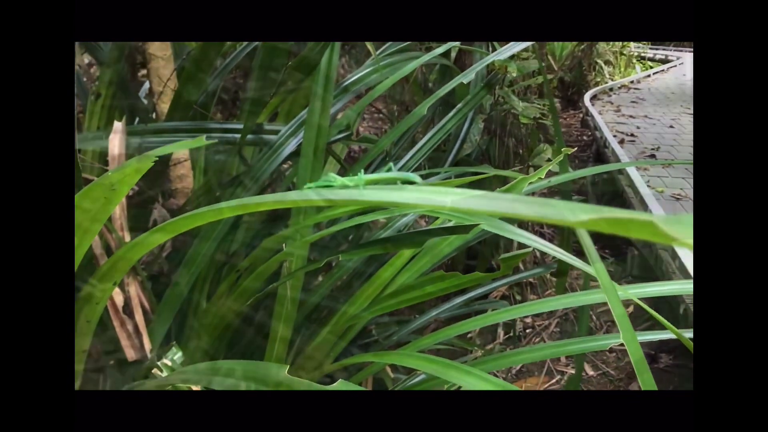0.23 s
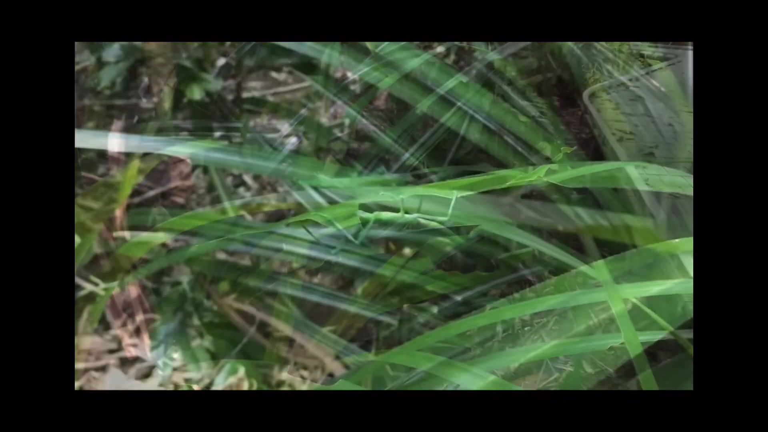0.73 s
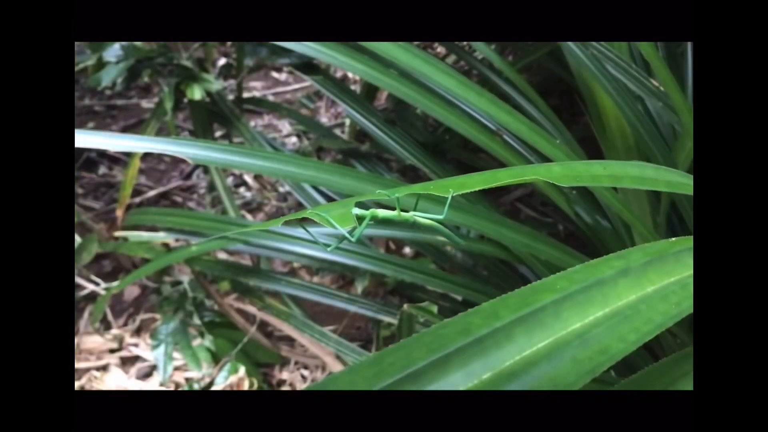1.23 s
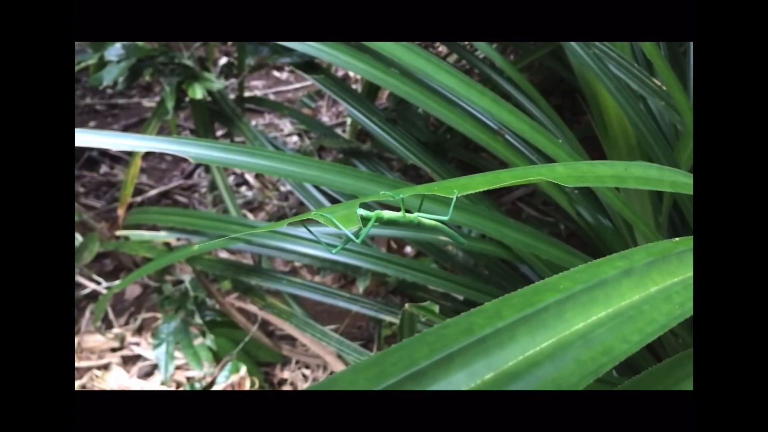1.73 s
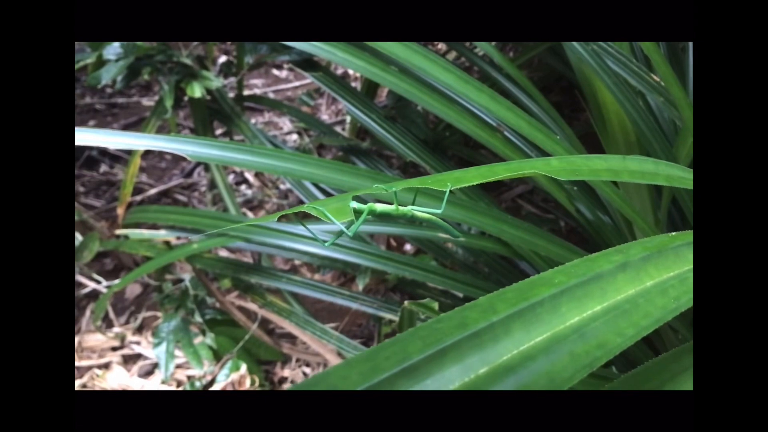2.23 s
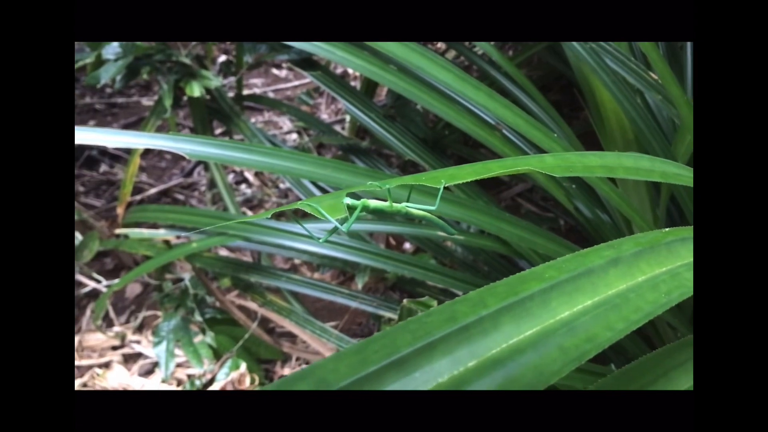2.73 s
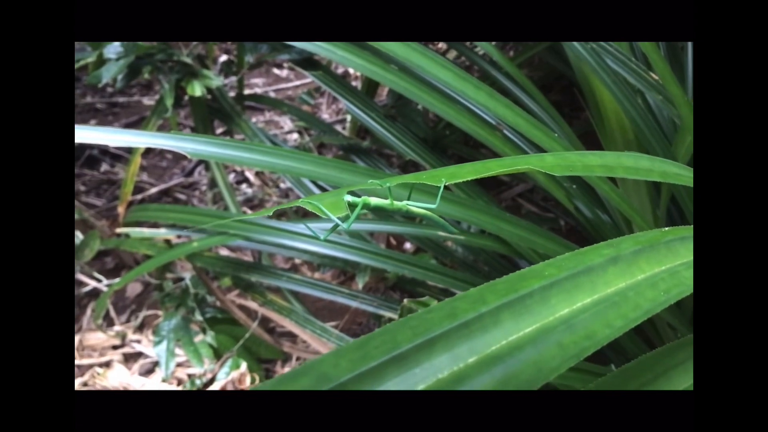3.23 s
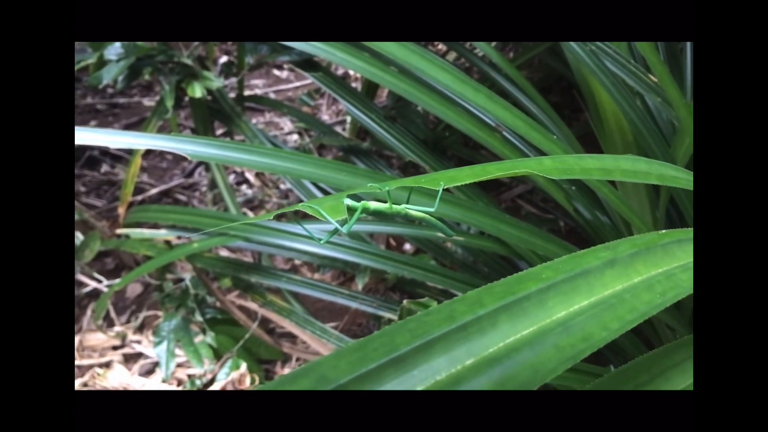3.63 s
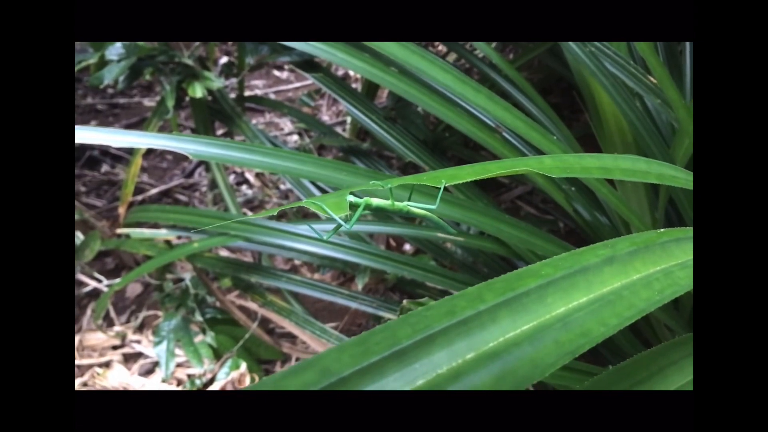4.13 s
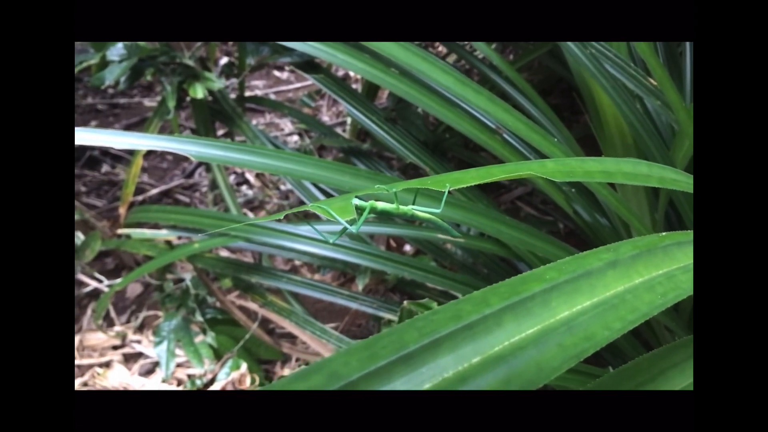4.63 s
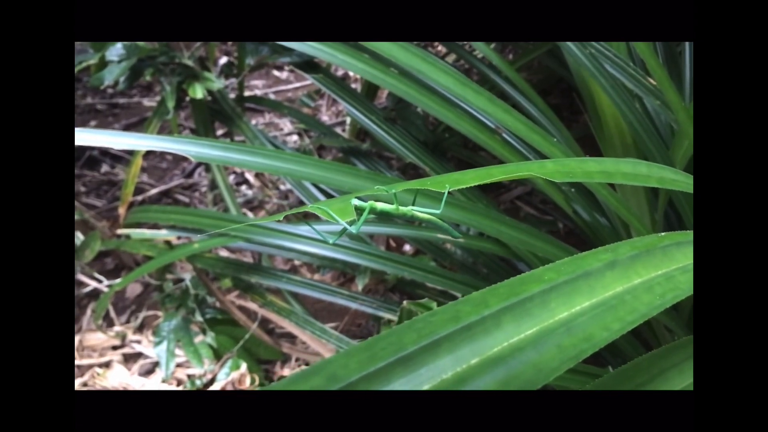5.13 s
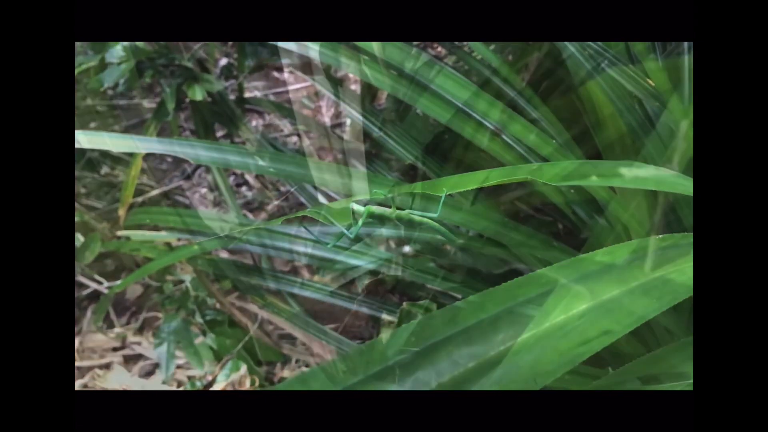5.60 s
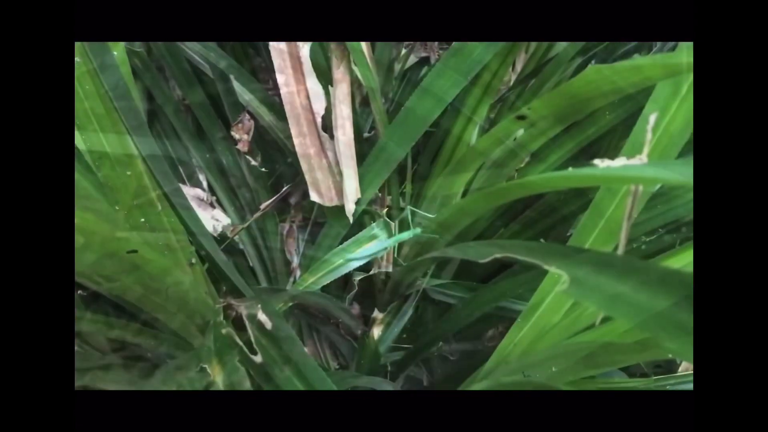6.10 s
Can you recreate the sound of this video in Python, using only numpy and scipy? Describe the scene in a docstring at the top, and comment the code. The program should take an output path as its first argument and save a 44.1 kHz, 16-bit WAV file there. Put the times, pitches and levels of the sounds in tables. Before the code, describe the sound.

A quiet forest hush fades into a steady, high-pitched cicada chorus with faint crickets and a low distant rumble. From about one second, birds give short whistles and chirps that echo lightly among the trees, with a far flock twittering behind them. Near the end a close cicada cuts in loudly, then fades into a single throbbing cicada over low rumble.

```python
"""A quiet forest spot dissolves into a rainforest path, where a cicada chorus drones near 9 kHz
over crickets, the hush of leaves and far rumble; each cicada's buckling tymbal ribs ring its abdomen.
From about 1 s birds whistle, a far flock swells with them, and trunks and leaves scatter the calls.
Just after 5 s a near cicada cuts in, and the path dissolves into a third spot,
where a single cicada throbs over low rumble."""
import sys
import numpy as np
from scipy import signal
from scipy.fft import rfft, irfft
from scipy.io import wavfile

SR = 44100
rng = np.random.default_rng(int(sys.argv[2]) if len(sys.argv) > 2 else 0)


def materialize(psi):
    """Save the field psi as 16-bit PCM at rate SR to the path in sys.argv[1].

    A 1-D psi becomes a single channel; in a 2-D psi each row is a channel.
    """
    bounded = np.clip(np.atleast_2d(psi).T, -1, 1)
    quanta = np.round(bounded * 32767).astype(np.int16)
    wavfile.write(sys.argv[1], SR, quanta)


N = 280476


def chorus():
    """Incoherent summation: many far cicadas blur into noise, and a few stand out of it."""
    # spectra of the far cicadas and of small hissing insects: freq_hz, level_db
    chorus_spectrum = [(4500, -40), (6320, -26), (7070, -23.5), (7680, -8), (8090, -0.5), (8440, 2),
                       (8970, 0.5), (9610, -1.5), (10200, -10), (11200, -25), (12800, -35), (13750, -23),
                       (14300, -44), (15700, -47)]
    hiss_spectrum = [(10000, -21), (11500, -11), (13000, 6), (13800, -3), (14400, -6), (15700, -14)]
    # single cicadas: body_hz, width_hz, buckles_per_s, buckles_per_throb, level_db
    singers = [(9520, 420, 446, 5, -53.5), (8510, 520, 280, 3, -56.5)]
    # cicadas that hold a tone: pitch_hz, waver_hz, strokes_per_s, throb_db, level_db
    steady_singers = [(9468, 10, 150, 2.9, -58.5), (9240, 10, 52, 2, -64), (9289, 10, 178, 2.8, -63),
                      (8950, 12, 130, 9, -52), (8520, 12, 60, 3.6, -68), (8313, 12, 77, 5.6, -60.5),
                      (9970, 12, 88.7, 9, -65.5)]
    blur = noise_bed(chorus_spectrum, level_db=-45.5, waver_db=0.32, rate_hz=13)
    hiss = noise_bed(hiss_spectrum, level_db=-73, waver_db=2.6, rate_hz=5.6)
    buzzes = sum(cicada(*singer, throb_db=0.5) for singer in singers)
    tones = sum(whine(*singer) for singer in steady_singers)
    return blur + hiss + buzzes + tones


def near_cicada(start_s=5.1185, attack_s=0.004, build_s=0.04):
    """Scattering off leaves blurs a near cicada's clicks toward noise, with steadier tones inside."""
    # spectrum of the song: freq_hz, level_db
    song_spectrum = [(3240, -66), (5500, -35), (6290, -25), (7020, -19), (7360, -16), (7520, -10.5),
                     (8050, 1), (8540, 1.5), (9310, 2), (9800, -7), (10100, -27), (10200, -10.5),
                     (11200, -43), (14600, -67), (22000, -120)]
    # tones within it: pitch_hz, waver_hz, strokes_per_s, throb_db, relative_level_db
    song_tones = [(8364, 8, 300, 3, -7), (8272, 10, 330, 3, -9.5), (9025, 12, 360, 4, -15),
                  (7950, 12, 280, 3.6, -16), (7703, 14, 420, 3, -17.5)]
    clicks = rms_one(buckles(per_s=538, per_throb=2, throb_db=6, scatter_db=1))
    buzz = coloured(clicks + 2 * rng.standard_normal(N), song_spectrum)
    song = rms_one(buzz + sum(whine(*tone) for tone in song_tones))
    since_s = np.maximum(np.arange(N) / SR - start_s, 0)
    attack = np.minimum(since_s / attack_s, 1)
    level_db = -32.5 - 1.5 * np.exp(-since_s / build_s)   # builds to full strength
    return attack * from_db(level_db) * song


def cicada(body_hz, width_hz, per_s, per_throb, level_db, throb_db):
    """Impulse excitation: each click of the tymbal rings the resonant abdomen."""
    clicks = buckles(per_s, per_throb, throb_db, scatter_db=1.5)
    return from_db(level_db) * rms_one(resonance(clicks, body_hz, width_hz))


def buckles(per_s, per_throb, throb_db, scatter_db):
    """Elastic buckling: a tymbal's ribs click in turn, strong to weak within each muscle stroke."""
    count = np.cumsum(per_s / SR * (1 + 0.01 * drift(3)))
    at = np.flatnonzero(np.diff(np.floor(count)))
    stroke = np.cos(2 * np.pi * count[at] / np.round(per_throb))
    click_db = throb_db * stroke + scatter_db * rng.standard_normal(N)[at]
    clicks = np.full(N, 1e-18)
    clicks[at] = from_db(click_db) * rng.choice([-1, 1], N)[at]
    return clicks


def whine(pitch_hz, waver_hz, strokes_per_s, throb_db, level_db):
    """Amplitude modulation: a cicada's wandering tone swells with every muscle stroke."""
    t = np.arange(N) / SR
    phase = 2 * np.pi * (pitch_hz * t + np.cumsum(waver_hz * drift(11.7)) / SR)
    stroke_phase = 2 * np.pi * np.cumsum(strokes_per_s * (1 + 0.00995 * drift(2.15))) / SR
    swell_db = throb_db * np.cos(stroke_phase) + 2.2 * drift(18)
    return from_db(level_db) * rms_one(from_db(swell_db) * np.sin(phase))


def birds():
    """Random modulation of amplitude and phase widens gliding whistles into hoarse bands."""
    # bird notes: start_s, length_s, start_hz, end_hz, level_db, hoarse_hz
    notes = [ (0.924, 0.054, 4315, 4090, -54, 46), (1.233, 0.15, 4650, 4430, -61, 150),
             (1.27, 0.25, 3280, 3080, -68, 30), (1.547, 0.072, 3780, 3560, -63, 350),
             (1.565, 0.069, 4360, 4150, -56, 70), (1.636, 0.098, 4180, 4240, -65, 47),
             (1.567, 0.064, 2430, 2310, -56.5, 20), (1.842, .03, 3650, 3400, -59, 80),
             (1.849, 0.029, 3220, 2960, -54, 40), (1.868, .04, 6000, 5600, -62, 80),
             (1.881, 0.073, 3080, 2900, -56, 160), (1.894, 0.038, 4300, 4080, -47.5, 25),
             (1.902, 0.051, 4800, 4150, -55, 50), (1.946, 0.018, 3970, 3770, -55, 80),
             (2.155, 0.12, 4214, 3717, -52, 31), (2.162, 0.07, 3600, 3340, -58.5, 54),
             (2.195, 0.06, 3350, 3010, -50.5, 110), (2.228, 0.045, 4170, 4170, -47, 19),
             (2.251, 0.091, 3640, 3870, -55, 230), (2.362, 0.076, 3930, 4220, -55, 170),
             (2.551, 0.044, 3015, 3024, -45.5, 12), (2.577, 0.096, 2836, 2106, -53, 350),
             (2.634, 0.067, 2930, 2900, -51, 38), (2.64, .08, 5860, 5820, -60, 170),
             (2.683, 0.082, 2900, 2685, -50.5, 46), (2.687, 0.05, 4310, 4600, -51, 150),
             (2.71, 0.089, 4310, 3990, -55.5, 52), (2.735, 0.067, 2875, 2684, -49, 30),
             (2.828, 0.087, 2820, 2760, -67, 30), (2.972, 0.11, 2877, 2847, -51, 35),
             (3.044, 0.083, 2847, 2050, -55, 370), (3.112, 0.073, 2705, 2587, -53.5, 41),
             (3.123, 0.053, 1726, 1600, -65, 24), (3.134, 0.063, 3230, 3200, -56.5, 92),
             (3.188, 0.064, 4180, 3990, -59, 150), (3.20, 0.063, 2943, 2815, -52.5, 33),
             (3.366, 0.085, 4570, 3990, -56.5, 38), (3.369, 0.091, 2880, 2800, -60.5, 22),
             (3.417, 0.053, 3840, 3800, -52, 70), (3.475, 0.056, 4300, 4100, -56.5, 83),
             (3.508, .02, 3270, 3290, -60, 60), (3.574, 0.073, 3870, 3740, -57.5, 120),
             (3.625, 0.023, 3920, 2190, -54, 60), (3.96, 0.018, 3060, 3060, -58, 52),
             (3.995, 0.068, 4440, 4170, -54, 100), (4.093, .04, 4200, 4500, -62, 100),
             (4.125, 0.061, 2740, 2750, -63.5, 26), (4.309, 0.1, 5540, 5010, -58.5, 600),
             (4.312, 0.071, 4520, 4170, -50, 160), (4.322, 0.13, 3760, 3600, -56.5, 230),
             (4.326, 0.093, 2770, 2470, -57, 230), (4.329, 0.12, 2187, 2035, -58, 73),
             (4.359, 0.086, 4180, 4176, -54.5, 82), (4.676, 0.098, 3146, 2375, -56.5, 230),
             (4.706, 0.23, 3580, 3780, -58.5, 160), (4.736, 0.058, 4290, 4250, -49.5, 75),
             (4.83, 0.037, 4260, 4170, -52.5, 100), (4.891, 0.1, 4000, 3640, -52, 79),
             (4.971, 0.081, 3670, 3250, -49, 55), (5.025, 0.02, 3260, 2280, -54, 23),
             (5.367, 0.14, 3810, 3550, -58.5, 120), (5.396, 0.026, 4120, 4180, -58, 40),
             (5.445, 0.121, 2950, 2844, -64, 110), (5.704, 0.19, 2500, 2710, -61, 270),
             (5.758, .14, 3620, 3310, -60, 430), (5.772, 0.089, 4320, 4320, -53, 140),
             (5.883, 0.038, 4110, 4300, -53.5, 68), (6.019, 0.0093, 5550, 5300, -51, 250)]
    calls = np.zeros(N)
    for start_s, length_s, start_hz, end_hz, level_db, hoarse_hz in notes:
        at, n = round(start_s * SR), min(round(length_s * SR), 10000)
        noise = rng.standard_normal(12000) + 1j * rng.standard_normal(12000)
        waver = smoothed(noise, hoarse_hz + 35)[2000:2000 + n]
        waver /= np.sqrt(np.mean(np.abs(waver) ** 2))
        steady = min(55 / hoarse_hz, 1.5)   # weight of the pure tone
        glide = np.exp(2j * np.pi * np.cumsum(np.linspace(start_hz, end_hz, n)) / SR)
        whistle = rms_one(np.real((steady + waver) * glide))
        envelope = signal.windows.tukey(n, 0.5) * from_db(np.linspace(1.5, -1.5, n))
        calls[at:at + n] += from_db(level_db) * envelope * whistle
    return calls


def canopy(sound, t60_s=0.57, onset_s=0.01):
    """Reverberation: trunks and leaves scatter calls into dying echoes; stirring leaves smear the pitch."""
    t = np.arange(SR) / SR
    echoes = rng.standard_normal(SR) * from_db(-60 * t / t60_s) * np.minimum(t / onset_s, 1)
    stirred = sound * (0.7 + 0.7 * drift(70))
    return signal.fftconvolve(stirred, echoes / np.linalg.norm(echoes))[:N]


def flock(calls, max_swell_db=6, memory_s=0.046):
    """Envelope following: the twitter of a far flock swells while near birds call."""
    pole = np.exp(-1 / (memory_s * SR))
    envelope = signal.lfilter([1 - pole], [1, -pole], np.abs(calls))
    swell_db = max_swell_db * np.tanh(rms_one(envelope))
    low = twitter(2405, 3506, tilt_db=0.44, level_db=-70.5 + swell_db)
    high = twitter(3506, 6013, tilt_db=-3.5, level_db=-69 + swell_db)
    return low + high


def twitter(low_hz, high_hz, tilt_db, level_db, peeps_per_s=700, bands=24):
    """A Poisson process: brief peeps ring at random moments and pitches."""
    strengths = from_db(3 * np.minimum(rng.exponential(1, N), 4))
    impulses = strengths * (rng.random(N) < peeps_per_s / SR)
    band = rng.integers(0, bands, N)
    gains = from_db(np.linspace(0, tilt_db, bands))
    peeps = np.zeros(N)
    for k, pitch_hz in enumerate(np.geomspace(low_hz, high_hz, bands)):
        peeps += gains[k] * resonance(impulses * (band == k) + 1e-18, pitch_hz, width_hz=160)
    return from_db(level_db) * rms_one(peeps)


def crickets(fade_db_per_s=0.8):
    """Narrow-band noise: far crickets merge into one wavering pitch that slowly fades."""
    band = resonance(rng.standard_normal(N), centre_hz=2205, width_hz=203)
    level_db = -60 - fade_db_per_s * np.arange(N) / SR + 1.1 * drift(4.7)
    return from_db(level_db) * rms_one(band)


def forest_hush():
    """Broadband noise: leaves and far rumble sum to a nearly steady hush."""
    # spectrum of leaves and rumble: freq_hz, level_db
    spectrum = [(30, -9.5), (70, 2), (140, -1), (345, -6), (455, -13), (800, -11), (940, -21), (1320, -17),
                (1620, -21.5), (2200, -15.5), (4240, -20.5), (5950, -25), (6200, -25), (9000, -34.5)]
    return noise_bed(spectrum, level_db=-53, waver_db=0.5, rate_hz=3.5)


def first_spot():
    """Shaped noise: a quieter place, with faint rumble and a shrill band near 9.5 kHz."""
    # spectrum of the first spot: freq_hz, level_db
    spectrum = [(25, -32), (50, 0), (130, -5.5), (200, -13), (350, -18.5), (900, -26), (3500, -29),
                (7000, -31), (9500, -16.5), (11000, -46), (15500, -62)]
    return noise_bed(spectrum, level_db=-55, waver_db=2, rate_hz=8.3)


def last_spot():
    """Deep amplitude modulation makes one cicada throb over low rumble."""
    # background spectrum of the last spot: freq_hz, level_db
    spectrum = [(25, -17), (42, -15), (70, -2.5), (250, -10.5), (420, -18), (900, -24.5), (5700, -26.5),
                (7500, -32), (9700, -17.5), (11000, -44), (13300, -39), (15500, -44)]
    background = noise_bed(spectrum, level_db=-46, waver_db=0.7, rate_hz=9)
    buzz = cicada(body_hz=9656, width_hz=450, per_s=517.5, per_throb=4, level_db=-48, throb_db=6)
    tone = whine(pitch_hz=9628.5, waver_hz=11, strokes_per_s=84.5, throb_db=13, level_db=-53)
    return background + buzz + tone


def noise_bed(spectrum, level_db, waver_db, rate_hz):
    """Gaussian noise of a given spectrum, its level wandering slowly."""
    gain = from_db(level_db + waver_db * drift(rate_hz))
    return gain * coloured(rng.standard_normal(N), spectrum)


def coloured(sound, spectrum):
    """Spectral shaping by rows of freq_hz, level_db; the result has rms 1."""
    freq_hz, level_db = np.transpose(spectrum)
    bins_hz = np.maximum(np.fft.rfftfreq(len(sound), 1 / SR), 1)
    gains = from_db(np.interp(np.log(bins_hz), np.log(freq_hz), level_db))
    return rms_one(irfft(rfft(sound) * gains, len(sound)))


def resonance(sound, centre_hz, width_hz):
    """Two identical damped resonators in cascade, each width_hz wide, with peak gain 1."""
    radius = np.exp(-np.pi * width_hz / SR)
    b = (1 - radius ** 2) / 2 * np.array([1, 0, -1])
    a = [1, -2 * radius * np.cos(2 * np.pi * centre_hz / SR), radius ** 2]
    return signal.lfilter(b, a, signal.lfilter(b, a, sound))


def drift(rate_hz):
    """Random fluctuation: low-passed noise, taken once the filter has settled; rms 1."""
    return rms_one(smoothed(rng.standard_normal(N + 20000), rate_hz)[20000:])


def smoothed(noise, corner_hz):
    """A critically damped two-pole low-pass, not normalised."""
    pole = np.exp(-2 * np.pi * corner_hz / SR)
    return signal.lfilter([1], [1, -2 * pole, pole * pole], noise)


def dissolve(start_s, length_s, rise_power, fall_power):
    """Power-law crossfade: gains of the sound that comes and of the sound that goes."""
    progress = np.clip((np.arange(N) / SR - start_s) / length_s, 0, 1)
    return progress ** rise_power, (1 - progress) ** fall_power


def from_db(db):
    """Decibels to amplitude ratio."""
    return 10 ** (np.asarray(db) / 20)


def rms_one(x):
    """Normalisation to rms 1."""
    return x / np.sqrt(np.mean(x ** 2) + 1e-20)


def scene():
    """Superposition: three spots dissolve one into the next while birds ring through the canopy."""
    path_in, first_out = dissolve(start_s=0.13, length_s=1.08, rise_power=1.07, fall_power=0.74)
    last_in, path_out = dissolve(start_s=5.274, length_s=1.045, rise_power=1.18, fall_power=1.12)
    calls = birds()
    far_calls = path_in * flock(calls)
    drone = path_in * path_out ** 0.44 * (forest_hush() + chorus())   # lingers in the fade
    insects = path_out * (near_cicada() + path_in ** 1.44 * crickets())   # crickets rise later
    other_spots = first_out * first_spot() + last_in * last_spot()
    direct = calls + from_db(-0.5) * far_calls
    echoes = canopy(from_db(-0.5) * calls + far_calls)
    return (drone + insects + other_spots + direct + echoes)[None]


def record(dry):
    """Band limiting: the microphone drops the deepest bass, and the top is cut steeply."""
    bass_cut = signal.butter(3, 38, "high", fs=SR, output="sos")
    treble_cut = signal.ellip(14, 0.3, 70, 15730, fs=SR, output="sos")
    return signal.sosfilt(treble_cut, signal.sosfilt(bass_cut, dry))


dry = scene()
out = record(dry)
materialize(out)
```